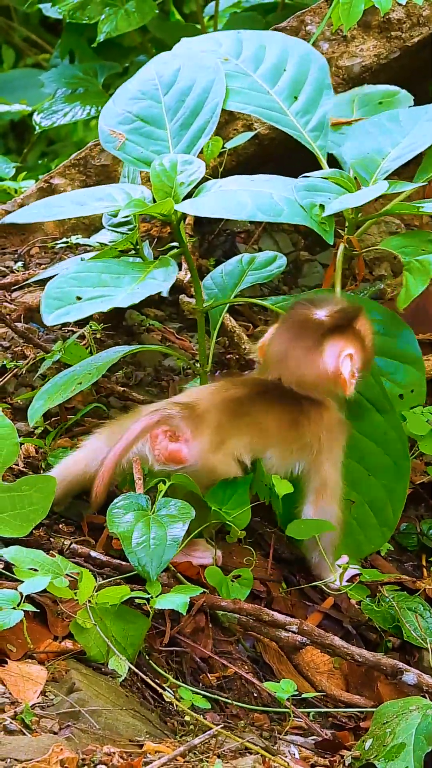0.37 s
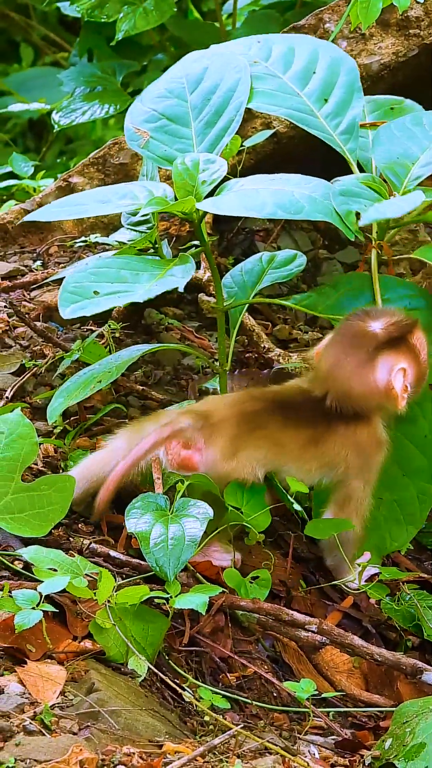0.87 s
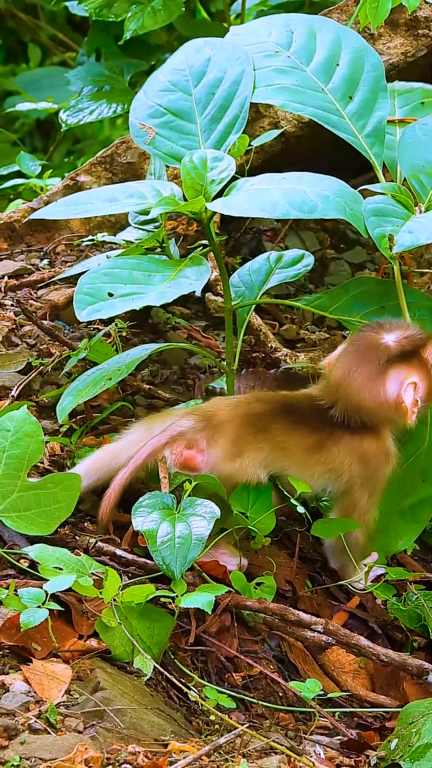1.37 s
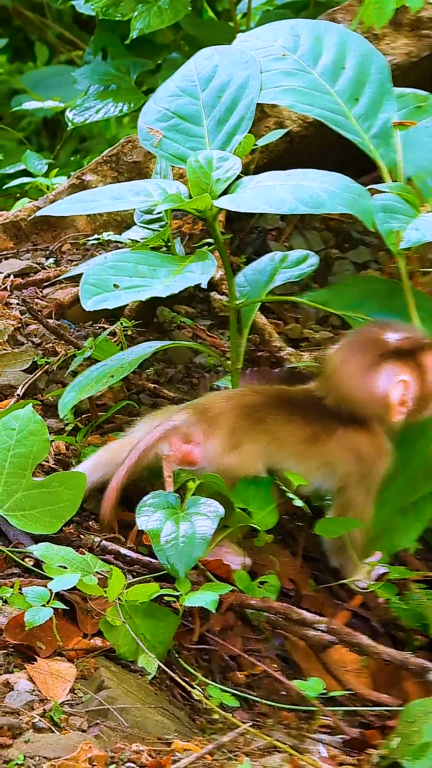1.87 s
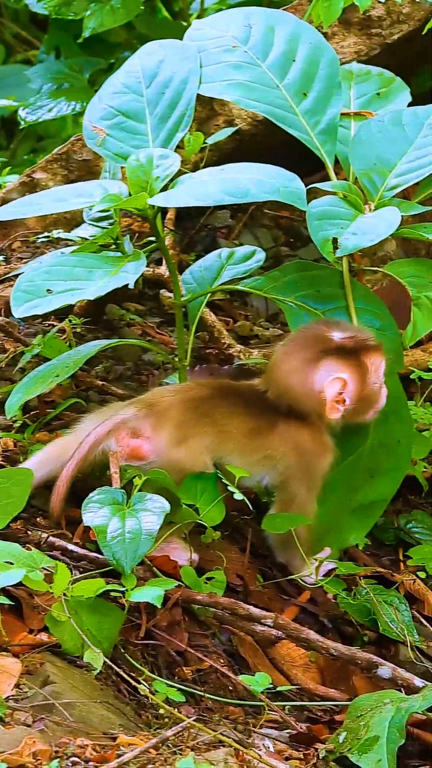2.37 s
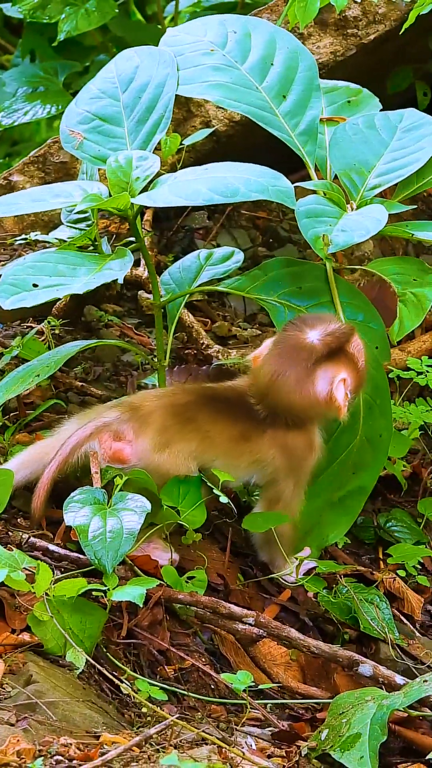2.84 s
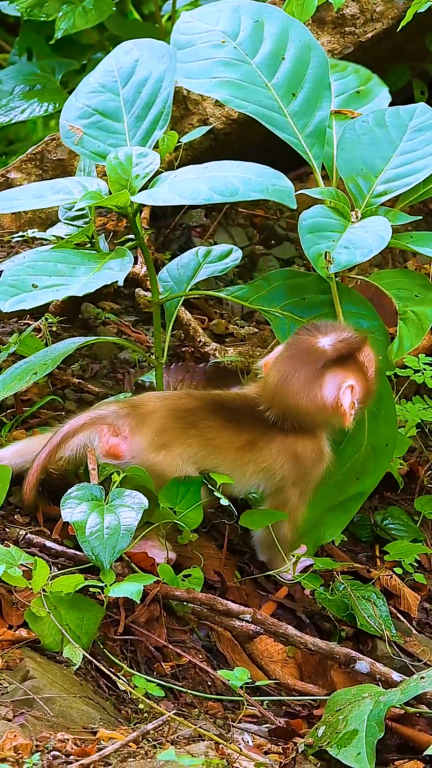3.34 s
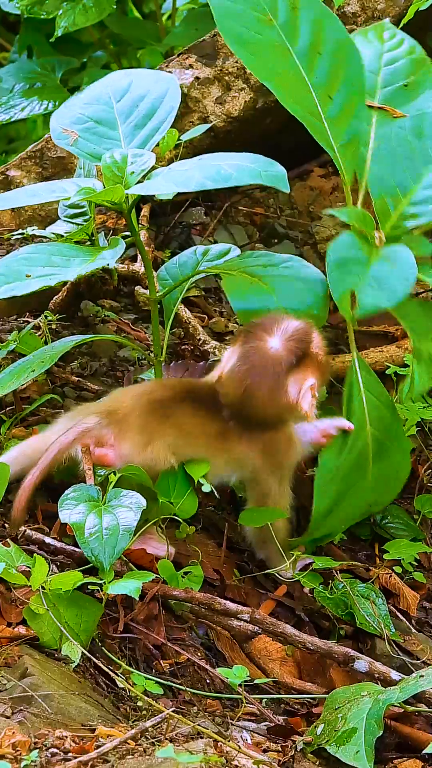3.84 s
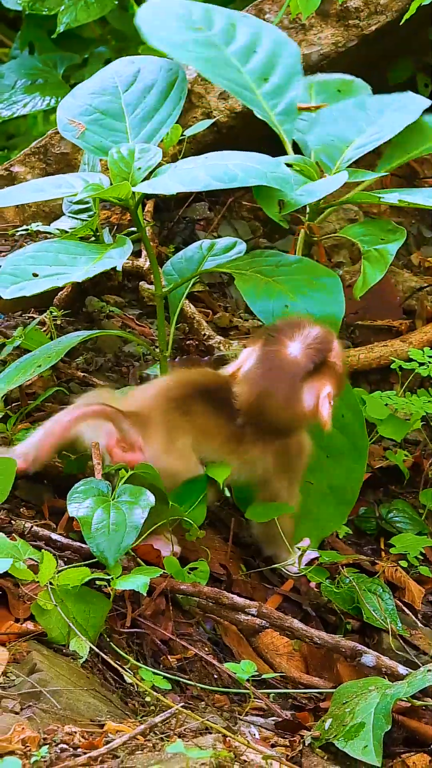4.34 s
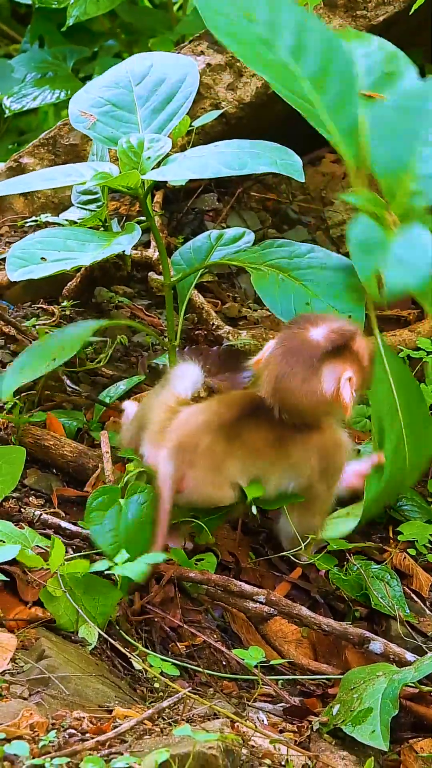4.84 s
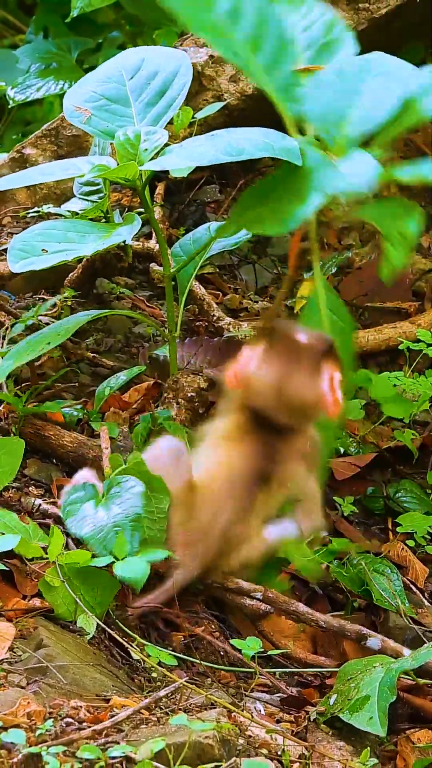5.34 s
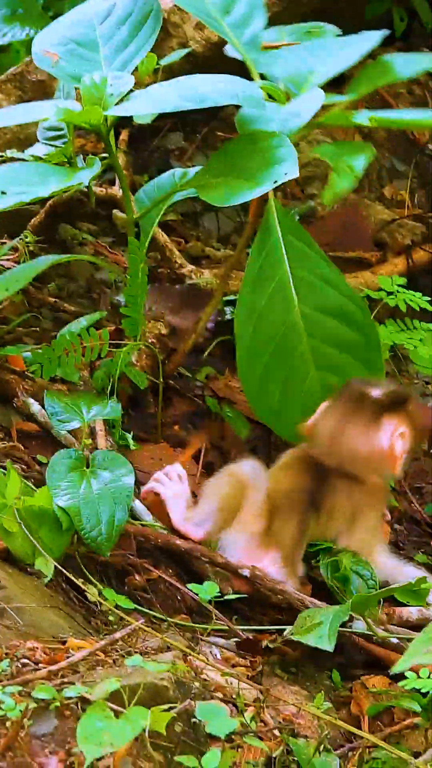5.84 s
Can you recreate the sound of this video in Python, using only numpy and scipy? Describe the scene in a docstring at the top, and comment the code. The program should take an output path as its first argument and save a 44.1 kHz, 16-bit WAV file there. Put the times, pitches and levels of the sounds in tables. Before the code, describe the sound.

In forest undergrowth a young monkey, some way off, gives six quick high chirps sliding downward, about two a second, then four longer, fainter whistles that climb and sag, all echoing among trunks. Close to the microphone twigs snap dryly, sharpest just after three seconds, and two short leaf rustles crackle around four. Low knocks bump the microphones. Soft hiss and thin insect tones lie behind; the right side is muffled, nearly silent except for knocks.

```python
"""Forest undergrowth: an animal some way off gives six short falling chirps, then four slow arched whistles,
nearly pure gliding partials echoing among the trees; one low and one high call are fainter.
Close by, noise bursts ring as snapping twigs, grains as rustling dry leaves, damped tones as knocks.
Behind lie shaped noise, narrow-band insects and a faint hum.
The left microphone is open; the right one is muffled and hears mostly the low knocks."""
import sys
import numpy as np
from scipy import signal
from scipy.fft import rfft, irfft
from scipy.io import wavfile
from scipy.ndimage import uniform_filter1d

SR = 44100
rng = np.random.default_rng(int(sys.argv[2]) if len(sys.argv) > 2 else 0)


def int16_out(signal):
    """Quantize to a 16-bit WAV file."""
    q = np.round(np.clip(np.atleast_2d(signal).T, -1, 1) * 32767)
    wavfile.write(sys.argv[1], SR, q.astype(np.int16))


def makeup_ratio(level_db):
    """Linear amplitude ratio for a level in decibels (20 dB per factor of ten)."""
    decades = np.asarray(level_db, float) / 20
    return 10 ** decades


N = 273065


def evened(x):
    """Scales to rms 1."""
    return x / np.sqrt(np.mean(x ** 2) + 1e-20)


def peaked(x):
    """Scales to peak 1."""
    return x / abs(x).max()


def read(points, hz):
    """Reads a spectrum on a log-frequency axis."""
    f, value = np.transpose(points)
    return np.interp(np.log(hz + 1), np.log(f + 1), value)


def add(mix, start_s, sound):
    """Adds a sound at a time, cut at the end of the mix."""
    part = mix[round(start_s * SR):][:len(sound)]
    part += sound[:len(part)]


def resonate(x, hz, width_hz):
    """One-pole complex resonance, gain about 1 at hz."""
    pole = np.exp((2j * np.pi * hz - np.pi * width_hz) / SR)
    return 2 * signal.lfilter([1 - abs(pole)], [1, -pole], x).real


def ring(x, hz, width_hz):
    """Steep resonance: two passes."""
    return resonate(resonate(x, hz, width_hz), hz, width_hz)


# background spectra: (frequency [Hz], relative density [dB])
BED_LEFT_SPECTRUM = [(40, -50), (100, -7.5), (200, -2.5), (650, 1), (1600, -2), (2400, -1.5), (3400, -1),
                     (4000, -14), (5400, 2), (6200, -18.5), (7000, -9.5), (7800, -24.5), (9000, -30.5),
                     (11000, -20.5), (12300, -37), (15600, -62)]
BED_RIGHT_SPECTRUM = [(40, -23), (110, -27.5), (200, 3), (330, 14.5), (500, 10), (700, 5), (950, 2),
                      (1500, 6), (3000, -56), (5000, -36.5), (8000, -33), (11000, -52), (15600, -43)]
# background rms: left [dB], right [dB]
BED_RMS_DB = [-51.5, -76]


def bed():
    """Unrelated random short-time spectra in the two microphones, with drifting patches."""
    frames, hz = N // 256 + 5, np.fft.rfftfreq(1024, 1 / SR)
    real, imag, patches = rng.standard_normal((3, 2, 513, frames))
    patches = uniform_filter1d(patches, 10, axis=1)  # across frequency
    patches_db = 3.07 * evened(uniform_filter1d(patches, 12, axis=2))  # along time
    colour_db = np.array([read(BED_LEFT_SPECTRUM, hz), read(BED_RIGHT_SPECTRUM, hz)])[:, :, None]
    spectra = (real + 1j * imag) * makeup_ratio(colour_db + patches_db)
    noise = signal.istft(spectra, nperseg=1024, noverlap=768)[1][:, :N]
    return np.array([makeup_ratio(db) * evened(side) for db, side in zip(BED_RMS_DB, noise)])


# faint low tones: (frequency [Hz], width per pass [Hz], left before swell [dB], right [dB])
HUM_TONES = [(686, 59, -71, -74.5), (762, 10.3, -66.5, -77.5)]
# swell on the left: (time [s], level [dB])
HUM_LEFT_SWELL = [(0, 1), (2.8, -11.5), (3.2, 9), (4.4, 1.5), (5, 0), (5.8, 13), (6.2, 4.5)]


def hum():
    """Two fuzzy low tones of narrow-band noise, swelling on the left."""
    noise = rng.standard_normal((2, N))
    out = np.zeros((2, N))
    for hz, width_hz, left_db, right_db in HUM_TONES:
        out += makeup_ratio([[left_db], [right_db]]) * evened(ring(noise, hz, width_hz))
    out[0] *= makeup_ratio(np.interp(np.arange(N) / SR, *np.transpose(HUM_LEFT_SWELL)))
    return out


# insect notes: (frequency [Hz], width per pass [Hz], rms [dB])
INSECT_NOTES = [(7040, 25, -70.5), (7267, 39, -66.5), (7330, 31, -65), (7360, 44, -66.5)]


def insects():
    """Narrow wavering whistles of a distant chorus: one noise through sharp resonances."""
    noise = rng.standard_normal(N)
    return sum(makeup_ratio(db) * evened(ring(noise, hz, width_hz)) for hz, width_hz, db in INSECT_NOTES)


# cricket trills: (start [s], length [s], rms [dB])
CRICKET_TRILLS = [(4.851, 0.14, -61), (5.755, 0.23, -68)]


def cricket():
    """Short trills: even noise pulses ring one note."""
    note_hz, width_hz, pulses_per_s = 3380, 90, 29.5
    out = np.zeros(N)
    for start_s, length_s, db in CRICKET_TRILLS:
        t = np.arange(0, length_s, 1 / SR)
        strokes = (t * pulses_per_s % 1 < .3) * rng.standard_normal(len(t))
        add(out, start_s, makeup_ratio(db) * evened(ring(strokes, note_hz, width_hz)))
    return out


# low knocks: (start [s], thud [Hz], thud on its louder side [dB], left tap resonance [dB],
# thud left against right [dB])
KNOCK_EVENTS = [ (0.138, 315, -32.5, -45, 43), (0.156, 347, -33, -44.5, 42), (1.937, 343, -49, -47, 12),
                (2.406, 318, -45, -27.5, -12), (2.425, 320, -42.5, -34, -12), (2.463, 320, -41, -38, -27),
                (2.558, 424, -33.5, -36.5, 9), (2.577, 343, -33.5, -38, -15), (2.626, 258, -32.5, -39, -11),
                (2.643, 237, -34, -45, -7), (3.012, 296, -30.5, -46, -18), (3.029, 314, -39.5, -46.5, -9),
                (4.395, 542, -27.5, -30, 6.5), (4.424, 462.5, -31.5, -41, -8.5), (4.471, 472, -43, -45, 15),
                (4.675, 278, -58, -56, -23), (5.675, 307, -43, -40, -10), ]


def knocks():
    """Dull thuds (damped sine and ringing noise) leaning to one side; shorter rough taps mostly left."""
    thud_width_hz, thud_t60_s = 315, 0.092
    tap_hz, tap_width_hz, tap_t60_s, tap_right_db = 904, 490, 0.088, -18
    out, t = np.zeros((2, N)), np.arange(6000) / SR
    for start_s, hz, thud_db, tap_db, lean_db in KNOCK_EVENTS:
        noise = rng.standard_normal(len(t))
        dying = makeup_ratio(-60 * t / thud_t60_s)
        tone = dying * np.sin(2 * np.pi * hz * t) * np.minimum(t / 0.002, 1)
        rumble = peaked(ring(noise * dying, hz, thud_width_hz))
        thud = makeup_ratio(thud_db) * peaked(tone + 0.93 * rumble)
        scratch = noise * makeup_ratio(-60 * t / tap_t60_s)
        tap = makeup_ratio(tap_db) * peaked(ring(scratch, tap_hz, tap_width_hz))
        rough = makeup_ratio(tap_db) * 0.052 * uniform_filter1d(scratch, 8)
        add(out[0], start_s, makeup_ratio(min(lean_db, 0)) * thud + tap + rough)
        add(out[1], start_s, makeup_ratio(min(-lean_db, 0)) * thud + makeup_ratio(tap_right_db) * tap)
    return signal.sosfilt(signal.butter(4, 164, "high", fs=SR, output="sos"), out)


# dry-leaf resonances: (frequency [Hz], width per pass [Hz], gain [dB])
LEAF_RESONANCES = [(4570, 650, 12), (5290, 1260, 7.5), (8090, 1210, 2.5), (10000, 1400, -21.5)]


def leaf(x):
    """Thin resonances of a dry leaf, in parallel."""
    return sum(makeup_ratio(db) * ring(x, hz, width_hz) for hz, width_hz, db in LEAF_RESONANCES)


# sweeps through dry leaves: (start [s], swell [s], fade [s], body at the swell's top [dB],
# mean treble against body at the swell's top [dB])
LEAF_SWEEPS = [(3.704, 0.034, 0.11, -23, -1.5), (4.085, 0.084, 0.085, -20, -1)]


def rustles():
    """Dense grains of uneven size, swelling and fading; brighter when fast and towards the end."""
    start_db, end_db, brighten_db = -34, -35.5, 6
    grains_per_s, flakes_per_s = 5000, 900
    out = np.zeros(N)
    for start_s, swell_s, fade_s, db, bright_db in LEAF_SWEEPS:
        t = np.arange(0, swell_s + fade_s, 1 / SR)
        swell_db = start_db * (1 - t / swell_s) ** 2
        fade_db = end_db * ((t - swell_s) / fade_s) ** 2
        speed_db = np.where(t < swell_s, swell_db, fade_db)
        chance, size, sign = rng.random((3, len(t)))
        grains = (chance < grains_per_s / SR) * np.maximum(size, .03) ** -.4 * np.sign(sign - .5)
        # a few brittle flakes stand out in the treble
        flakes = grains * np.where(chance < flakes_per_s / SR, 3.5, .6)
        hollow = makeup_ratio(-33.5 - db) * evened(ring(grains, 783, 316))  # cancels the sweep's own level
        body = evened(evened(ring(grains, 2740, 970)) + hollow)
        treble_db = bright_db + brighten_db * (2 * t / t[-1] - 1) + 0.2 * speed_db
        add(out, start_s, makeup_ratio(db + speed_db) * (body + makeup_ratio(treble_db) * evened(leaf(flakes))))
    return out


# twig and leaf snaps: (start [s], body peak [dB], body [Hz], treble against body [dB], t60 before burst [s])
SNAP_EVENTS = [ (.084, -33, 2410, 3, 0.028), (0.109, -22.5, 2650, -4, 0.32),
               (0.199, -28.5, 2040, -30, 0.18), (0.405, -24, 3200, -6.5, 0.15),
               (0.911, -23.5, 3290, -5, 0.2), (1.005, -26.5, 2360, -22, 0.15),
               (1.068, -29.5, 2460, -1, 0.28), (1.486, -28.5, 3170, -6, 0.18),
               (1.602, -28, 2710, -13, 0.049), (1.622, -35.5, 2430, -2, .089),
               (1.895, -31.5, 1430, -7, 0.15), (2.637, -33.5, 2650, -27, 0.076),
               (3.08, -30.5, 2880, 1.5, 0.0091), (3.118, -13.5, 2306, -61, 0.18),
               (3.326, -16, 3050, -12.5, 0.044), (3.332, -3.5, 2613, -49, 0.03),
               (4.319, -23, 2760, -17, .0091), (4.388, -20, 3130, -12, 0.0099),
               (4.396, -13, 2840, -9.5, 0.021), (4.755, -17, 2425, -54, 0.18), (5.527, -42, 1898, -23, .02),
               (5.588, -40, 2180, -12, 0.0215), (5.62, -38, 2330, -8, .02), (5.676, -32, 1410, -15, 0.11), ]
# stems cracking during the sweeps: (time [s], level [dB])
STEM_CRACKS = [(3.718, -26.5), (3.734, -2), (3.741, -6.5), (3.744, -16.5), (3.755, 1), (3.758, -20),
               (3.777, -9.5), (3.782, -7.5), (3.807, -19.5), (4.114, -13.5), (4.134, -4), (4.152, 0.5),
               (4.165, -20), (4.178, -1.5), (4.19, -9), (4.208, -6)]


def snap(hz, treble_db, t60_s):
    """A crack and a dying crackle that ring a woody body and the leaf."""
    t = np.arange(6000) / SR
    burst = 0.85 + 0.82 * np.exp(-t / 0.0059)  # the first fibres go at once
    attack = np.minimum(t / 0.0028, 1) ** 2
    drive = makeup_ratio(-60 * t / t60_s) * burst * rng.standard_normal(len(t)) * attack
    crack = np.exp(-((t - .0022) / 0.0006) ** 2) * np.cos(2 * np.pi * hz * t)
    body = crack + 0.78 * peaked(resonate(ring(drive, hz, 960), hz, 2400))
    hiss = 0.041 * np.diff(drive * burst ** 2, prepend=0)
    return peaked(body) + makeup_ratio(treble_db) * peaked(leaf(drive * burst) + hiss)


def snaps():
    """Twig snaps, plus short stem cracks of scattered pitch."""
    stem_hz, stem_spread_hz, stem_treble_db, stem_t60_s = 2710, 280, -14.5, 0.0087
    out = np.zeros(N)
    for start_s, db, hz, treble_db, t60_s in SNAP_EVENTS:
        add(out, start_s, makeup_ratio(db) * snap(hz, treble_db, t60_s))
    for start_s, db in STEM_CRACKS:
        hz = stem_hz + stem_spread_hz * rng.uniform(-1.16, 1)
        add(out, start_s, makeup_ratio(db) * snap(hz, stem_treble_db, stem_t60_s))
    return out


# echo among the trunks: (frequency [Hz], t60 at depth 1 [s])
TRUNK_ECHO = [(1000, 0.18), (2800, 1), (4400, 1), (7000, 1), (11000, 0.45)]


def trees(x, depth):
    """Sparse, clumped echoes of random sign from the trunks, each band dying at its own speed."""
    taps = np.zeros(SR)
    at = np.arange(40, SR - 20, 20) + rng.integers(0, 20, (SR - 41) // 20)
    clumps_db = 1.5 * evened(uniform_filter1d(rng.standard_normal(len(at)), 12))
    taps[at] = rng.choice([-1., 1.], at.shape) * makeup_ratio(clumps_db)
    hz, t, z = signal.stft(taps, SR, nperseg=256)
    t60_s = depth * read(TRUNK_ECHO, hz)[:, None]
    tail = signal.istft(z * makeup_ratio(-60 * t / t60_s), SR, nperseg=256)[1]
    return signal.fftconvolve(x, tail / np.linalg.norm(tail))[:N]


def call(rows, voice):
    """Nearly pure partials on a gliding pitch with rounded corners; returns start [s] and sound."""
    s, hz, db = np.transpose(rows)
    t = np.arange(s[0], s[-1], 1 / SR)
    pitch_hz = uniform_filter1d(np.interp(t, s, hz), 200, mode="nearest")
    turns = np.cumsum(pitch_hz) / SR
    tone = sum(makeup_ratio(partial_db - fade * (t - s[0])) * np.sin(2 * np.pi * multiple * turns)
               for multiple, partial_db, fade in voice)
    slow = uniform_filter1d(uniform_filter1d(rng.standard_normal(len(t)), 200), 200)
    flutter_db = 2.6 * evened(slow)  # moving air
    level = np.sqrt(2) * makeup_ratio(np.interp(t, s, db) + flutter_db)
    return s[0], level * tone * signal.windows.tukey(len(t), .12)


# fainter calls, low and high: (time [s], glide, sounded at 0.98 of this [Hz], level [dB])
LOW_MOAN = [(1.3, 308.6, -72), (1.55, 238.5, -63.5), (1.68, 232, -77), (1.79, 228, -55.5), (1.84, 230, -86)]
HIGH_WHISTLE = [(5.68, 5840, -55), (5.71, 6410, -56), (5.92, 6470, -65.5), (6.06, 6170, -66)]


def faint_calls():
    """One low and one high call, a single gliding partial each."""
    out = np.zeros(N)
    for rows in (HIGH_WHISTLE, LOW_MOAN):
        add(out, *call(rows, [(0.98, 0.01, 0.016)]))
    return out


# arched whistles: (start [s], arch [s], drop [s], top pitch [Hz], base level [dB])
WHISTLE_EVENTS = [(2.855, 0.21, 0.024, 4390, -40.5), (3.925, 0.19, 0.011, 4427, -41),
                  (4.86, .22, 0.083, 4364, -37.5), (5.85, 0.19, 0.085, 4550, -35.5)]
# partials: (multiple of the pitch, level [dB], fade [dB/s])
WHISTLE_PARTIALS = [(.5, -19.5, 0.073), (1, -0.5, 0.48), (1.5, -32.5, 0.066)]
# climb: (share of the arch, share of top pitch, level [dB])
ARCH_CLIMB = [(0, .82, -16.5), (0.118, .94, -8.5), (.36, 1.0, 0.5)]
# sag: (share of the arch, pitch [Hz], level [dB])
ARCH_SAG = [(0.619, 4333, -1.5), (.83, 4253, -4), (1.0, 4034, -2.5)]
# drop, as far as breath lasts: (time after the arch [s], pitch [Hz], level [dB])
FINAL_DROP = [(.03, 3470, -8.5), (.062, 3037, -2), (.08, 3120, -7)]


def whistles():
    """Each climbs, sags slowly and drops quickly; the drop may break off early."""
    out = np.zeros(N)
    for start_s, arch_s, drop_s, top_hz, db in WHISTLE_EVENTS:
        rows = [(share * arch_s, ratio * top_hz, effort) for share, ratio, effort in ARCH_CLIMB]
        rows += [(share * arch_s, hz, effort) for share, hz, effort in ARCH_SAG]
        rows += [(arch_s + s, hz, effort) for s, hz, effort in FINAL_DROP]
        s, hz, effort_db = np.transpose(rows)
        t = np.linspace(0, arch_s + drop_s, num=80)
        glide = np.transpose([start_s + t, np.interp(t, s, hz), db + np.interp(t, s, effort_db)])
        add(out, *call(glide, WHISTLE_PARTIALS))
    return out


# falling chirps: (start [s], length [s], top before rounding [Hz], base level [dB],
# curve of the fall [1 straight, more = steep at first])
CHIRP_EVENTS = [(.028, .075, 3770, -25, 0.96), (0.507, 0.076, 3956, -20, 1.34),
                (1.053, .072, 3820, -19, 1.1), (1.601, 0.076, 3895, -24, 1.12),
                (2.09, .078, 3814, -26.5, 0.97), (2.635, 0.086, 4670, -22, 2.2)]
# partials: (multiple of the pitch, level [dB], fade [dB/s])
CHIRP_PARTIALS = [(1, -1, 23), (2, -16.5, 702), (3, -19, 900)]


def chirps():
    """A flick up, a short hold and a fall, loudest where it meets the throat resonance."""
    flick_hz, flick_s, flick_db, hold_s, floor_hz = 2669, 0.0095, -14.5, 0.0067, 2437
    throat_hz, above_db_per_khz, below_db_per_khz = 2850, -9.5, -21.5
    out = np.zeros(N)
    for start_s, length_s, top_hz, db, curve in CHIRP_EVENTS:
        t = np.linspace(0, length_s, num=60)
        left = 1 - np.clip((t - flick_s - hold_s) / (length_s - flick_s - hold_s), 0, 1)
        fall_hz = floor_hz + (top_hz - floor_hz) * left ** curve
        off_khz = (fall_hz - throat_hz) / 1000
        throat_db = np.where(off_khz > 0, above_db_per_khz, below_db_per_khz) * abs(off_khz)
        hz = np.where(t < flick_s, np.interp(t, [0, flick_s], [flick_hz, top_hz]), fall_hz)
        level_db = db + np.where(t < flick_s, flick_db, throat_db)
        add(out, *call(np.transpose([start_s + t, hz, level_db]), CHIRP_PARTIALS))
    return out


def scene():
    """Far calls are about half echo, near snaps almost dry; the right hears only knocks, bed and hum."""
    near = snaps() + rustles()
    near = near + makeup_ratio(-30.5) * trees(near, depth=0.24)
    falling = chirps()
    arched = whistles() + faint_calls()
    arched_high = resonate(arched, 4470, 2200)  # the whistles echo mostly on their high notes
    far = falling + makeup_ratio(-1.0) * trees(falling, depth=0.84)
    far = far + arched + makeup_ratio(0.5) * trees(arched_high, depth=0.97)
    left = far + near + insects() + cricket()
    return np.array([left, np.zeros(N)]) + knocks() + bed() + hum()


def band_limit(x):
    """A steep low-pass at the top of the band."""
    return signal.sosfilt(signal.butter(12, 15750, fs=SR, output="sos"), x)


def record(dry):
    """Mild gain control and a bass cut; the treble above the crossover arrives a little late."""
    crossover_hz, crossover_width_hz, treble_delay_s, bass_cut_hz = 3950, 150, .0098, 110
    power_db = 10 * np.log10(abs(uniform_filter1d(dry ** 2, 3000, axis=1)) + 1e-12)
    ducked = dry / makeup_ratio(0.15 * np.maximum(power_db + 35, 0))
    ducked = np.pad(ducked, ((0, 0), (SR, 0)), "reflect")  # sound was already there before the start
    hz = np.fft.rfftfreq(N + SR, 1 / SR)
    high = np.clip((hz - crossover_hz) / crossover_width_hz + .5, 0, 1)
    late = np.sqrt(1 - high) + np.sqrt(high) * np.exp(-2j * np.pi * hz * treble_delay_s)
    bass_cut = 1 / np.sqrt(1 + (bass_cut_hz / (hz + 1)) ** 8)
    mix = irfft(rfft(ducked) * late * bass_cut, N + SR)[:, SR:]
    return band_limit(mix)


dry = scene()
out = record(dry)
int16_out(out)
```